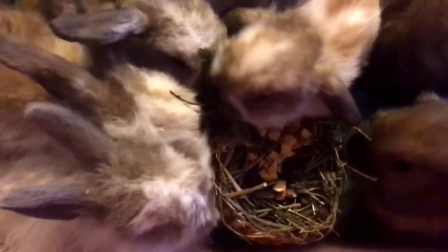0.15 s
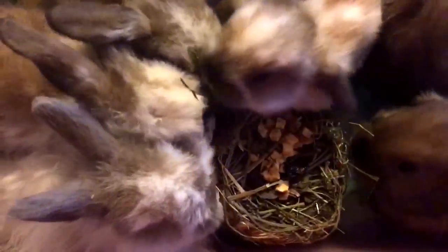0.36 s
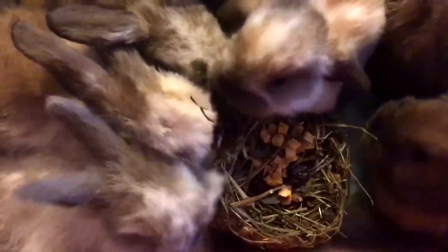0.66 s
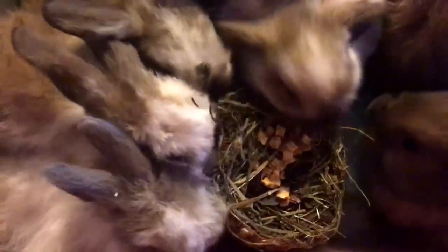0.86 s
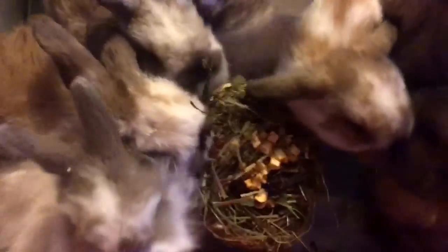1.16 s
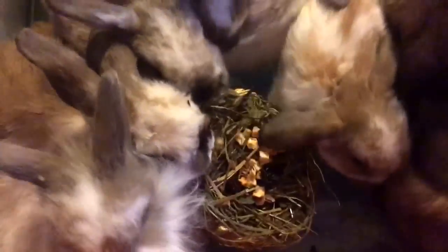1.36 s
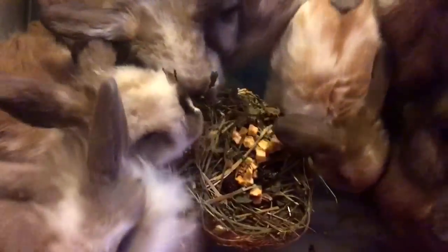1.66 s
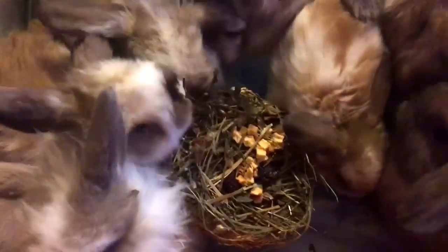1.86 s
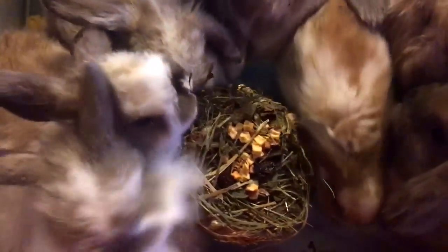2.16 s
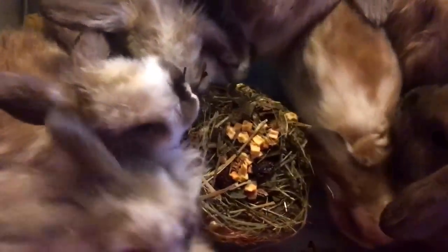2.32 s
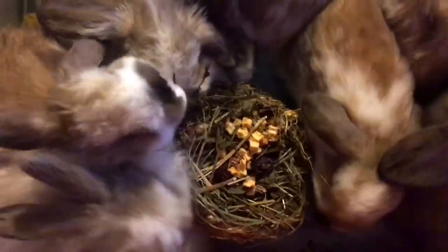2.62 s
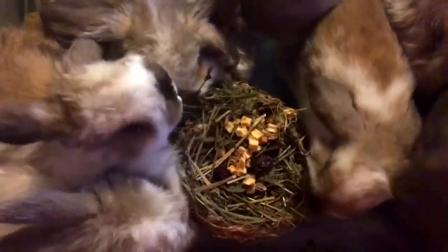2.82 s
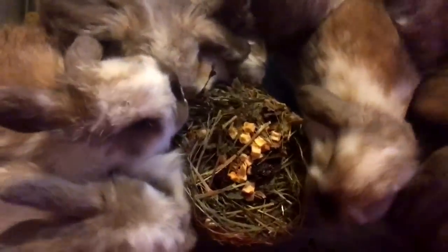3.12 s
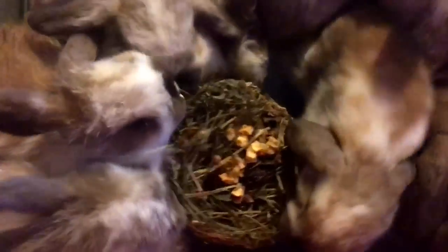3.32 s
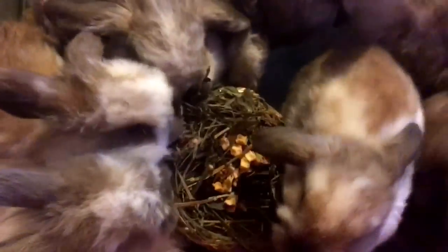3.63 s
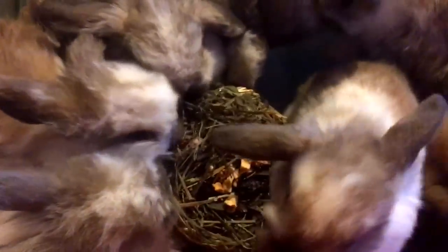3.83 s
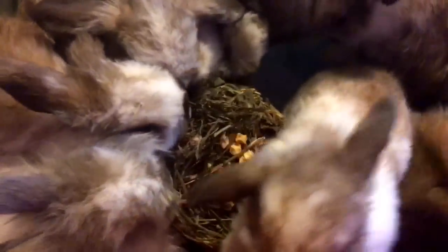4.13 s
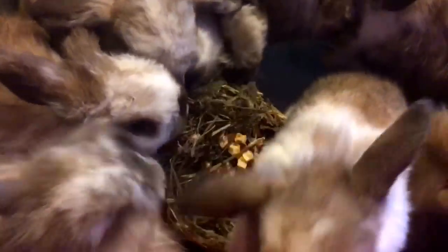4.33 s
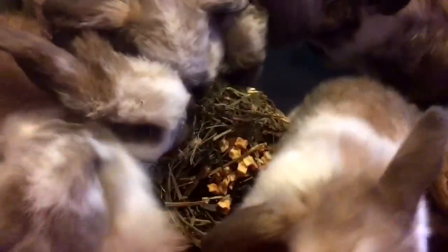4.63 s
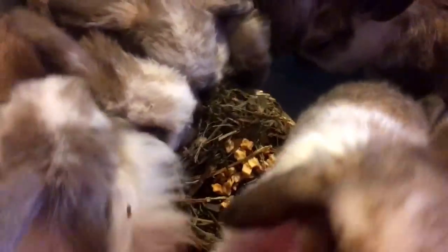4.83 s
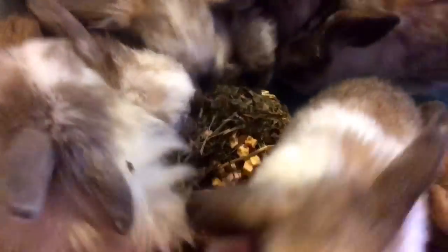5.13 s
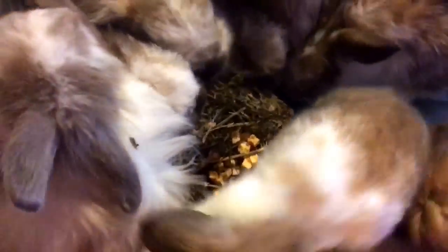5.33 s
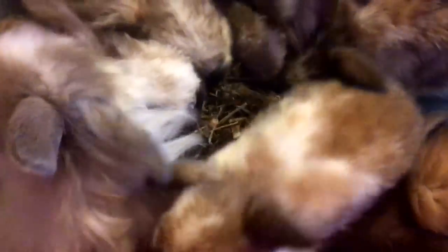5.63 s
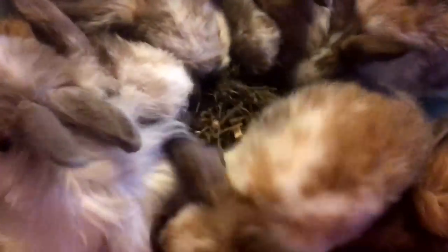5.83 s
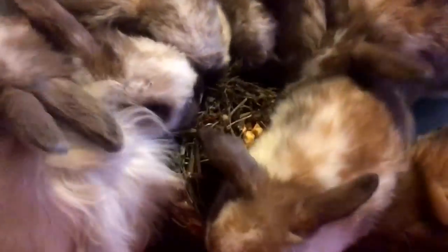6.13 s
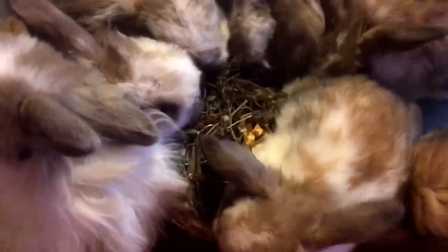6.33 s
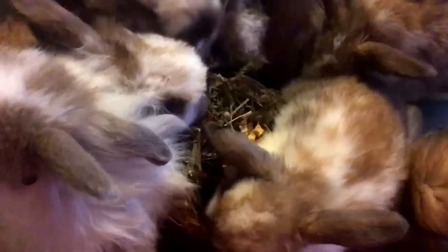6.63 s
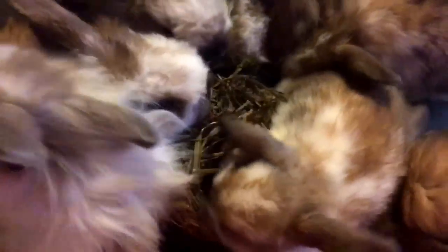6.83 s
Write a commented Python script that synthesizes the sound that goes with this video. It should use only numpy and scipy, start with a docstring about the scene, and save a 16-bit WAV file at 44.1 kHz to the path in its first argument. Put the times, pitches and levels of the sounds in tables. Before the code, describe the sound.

In a quiet room with a steady low hum and rumble, rabbits chew hay at close range: crisp little snaps, grainy rustling and dull tooth clicks, mixed with soft paw steps. Midway comes the brightest crackle as several stalks tear, then a rabbit lands with a dull thud. More crunching leads into a short scuffle of paws on boards, and the munching continues to the end.

```python
"""Rabbits eat from a ball of dry hay, close to the microphone, over a quiet room's appliance hum and rumble.
From the start stalks rustle, snap and faintly squeak, teeth crunch and paws knock on the pen floor.
At 3.3 s a tug breaks a cluster of stalks, and just after it a body lands with the heaviest thud.
From 4.9 to 5.8 s paws scuffle and thump on the boards; the nibbling carries on to the end at 7 s."""
import sys
import numpy as np
from scipy import signal
from scipy.fft import rfft, irfft, next_fast_len
from scipy.io import wavfile
from scipy.ndimage import uniform_filter1d, map_coordinates

SR = 44100
rng = np.random.default_rng(int(sys.argv[2]) if len(sys.argv) > 2 else 0)


def put_to_file(sound):
    """Save the sound as 16-bit audio at rate SR, in the file named by the first command-line argument."""
    columns = np.atleast_2d(sound).T  # one column per channel
    safe = np.clip(columns, -1, 1)
    whole_steps = np.round(safe * 32767)
    wavfile.write(sys.argv[1], SR, whole_steps.astype(np.int16))


N = 307377

# Contacts: (time [s], level [dB], pitch [Hz])
STALK_SNAPS = [(.1675, -47, 3900), (.2583, -51.5, 13400), (.2625, -52, 8500), (.2876, -50.5, 8300),
               (.3967, -54, 8860), (.6734, -46.5, 9400), (.7163, -51, 8000), (.8155, -43.5, 5900),
               (.8328, -48.5, 10600), (.87, -52.5, 8420), (1.068, -37, 8300), (1.0949, -44, 8870),
               (1.2589, -46.5, 5760), (1.3439, -46.5, 8800), (1.38, -45, 6310), (1.3995, -60, 14400),
               (1.4515, -56, 6430), (1.6371, -53, 4430), (1.8159, -49, 8300), (1.94, -55.5, 5480),
               (2.0039, -51.5, 4810), (2.107, -51.5, 3420), (2.1665, -49.5, 4480), (2.2422, -54.5, 8600),
               (2.3142, -42.5, 4520), (2.4481, -51, 4200), (2.7117, -47, 3500), (2.7682, -55.5, 13400),
               (2.8866, -51, 4350), (2.8959, -40.5, 6040), (3.0898, -41.5, 6030), (3.1595, -54.5, 11100),
               (3.2816, -43, 8810), (3.2896, -33.5, 6100), (3.3246, -41, 8600), (3.3352, -25, 8000),
               (3.3407, -32.5, 8560), (3.3551, -42.5, 11600), (3.3657, -37, 11800), (3.3732, -35.5, 6770),
               (3.3811, -41, 9250), (3.3847, -37.5, 5700), (3.39, -37, 8940), (3.3979, -45, 9120),
               (3.455, -46, 9040), (3.5027, -46, 5830), (3.5394, -40.5, 9440), (3.5331, -48.5, 8940),
               (3.5521, -45, 8610), (3.5554, -40, 9990), (3.6223, -43, 8840), (3.6682, -45, 9100),
               (3.6856, -42.5, 5900), (3.7021, -51.5, 5910), (3.712, -52.5, 5930), (3.78, -54, 8700),
               (3.8759, -44.5, 3930), (4.0437, -50, 6270), (4.1088, -35.5, 6150), (4.121, -48, 5890),
               (4.2759, -44, 6050), (4.309, -41, 6500), (4.3171, -47, 8610), (4.4011, -46, 8790),
               (4.4938, -48.5, 9260), (4.6195, -53.5, 13500), (4.6434, -56.5, 6430), (4.7589, -49.5, 6400),
               (4.8364, -52, 8400), (4.9094, -46.5, 9460), (4.9303, -48, 5500), (4.9365, -44.5, 5640),
               (5.0102, -50, 6680), (5.0526, -48, 6680), (5.1106, -51, 9160), (5.1214, -38, 8800),
               (5.1736, -48.5, 5990), (5.2302, -41.5, 11700), (5.2666, -40.5, 5600), (5.271, -47, 9470),
               (5.5664, -47.5, 13100), (5.6163, -45, 13500), (5.4697, -56, 5670), (5.6846, -45.5, 12000),
               (5.7116, -47, 5900), (5.9934, -47.5, 7160), (6.0512, -47, 5420), (6.0876, -48, 9600),
               (6.0999, -42, 9900), (6.1396, -51.5, 8890), (6.209, -55, 4900), (6.2223, -48, 6770),
               (6.556, -49, 8290), (6.6133, -46, 5630), (6.6293, -46, 9400), (6.6598, -50, 5900),
               (6.7689, -45.5, 8510), (6.7971, -55.5, 10000), (6.8024, -47, 10800), (6.8611, -51.5, 4360),
               (6.8877, -44, 11300)]  # stalks breaking
TOOTH_BITES = [(.1674, -48, 750), (.251, -59.5, 764), (.3427, -58.5, 1140), (0.6752, -55.5, 1100),
               (.7171, -47.5, 670), (0.8167, -57.5, 1110), (1.3783, -43.5, 780), (1.5946, -52, 1040),
               (1.7188, -53, 682), (1.8174, -52, 1170), (1.9077, -52, 720), (2.0043, -51, 2230),
               (2.1095, -52, 1960), (2.315, -46, 666), (2.346, -49, 2000), (2.5047, -49.5, 2120),
               (2.6469, -52, 730), (2.7027, -50, 2200), (2.712, -43.5, 640), (2.809, -61, 1930),
               (2.8964, -43.5, 1560), (3.0904, -42, 2210), (3.2901, -56, 1970), (3.3552, -45, 2070),
               (3.3736, -46, 1990), (3.3982, -42.5, 2030), (3.5576, -30.5, 1250), (3.6287, -50.5, 2170),
               (3.7026, -38, 1260), (3.7346, -48.5, 2530), (3.876, -48, 1780), (4.1093, -32, 1180),
               (4.4817, -45.5, 1640), (4.5284, -61, 1030), (4.9311, -45.5, 1120), (4.9367, -41.5, 1840),
               (4.9558, -47.5, 1090), (5.1113, -42.5, 1960), (5.1215, -39.5, 1830), (5.223, -47.5, 2120),
               (5.2297, -41, 1910), (5.271, -50, 2150), (5.3639, -43.5, 950), (5.4064, -43.5, 1940),
               (5.4449, -39.5, 734), (5.4648, -47, 1290), (5.509, -45.5, 708), (5.5754, -50, 2210),
               (5.7424, -45, 809), (5.9164, -56.5, 1900), (5.9215, -49.5, 1000), (5.9548, -53.5, 2130),
               (6.14, -47, 1920), (6.3272, -55.5, 1980), (6.5, -50, 1730), (6.7025, -55, 875),
               (6.7466, -53, 1960), (6.798, -46.5, 1910)]  # teeth meeting
PAW_KNOCKS = [(.021, -42, 268), (0.208, -47.5, 273), (.25, -41, 400), (.251, -45.5, 665), (.372, -33, 284),
              (.385, -39.5, 394), (.516, -53.5, 553), (.719, -53.5, 340), (1.195, -49, 264),
              (1.379, -46, 690), (1.91, -50, 600), (2.166, -40.5, 224), (2.382, -49, 290),
              (2.705, -49, 330), (2.74, -37, 324), (2.845, -50, 275), (2.955, -51.5, 224),
              (3.555, -32.5, 208), (3.71, -53, 345), (3.792, -44, 308), (4.814, -52, 355),
              (4.932, -43, 412), (4.935, -30.5, 362), (5.029, -42, 504), (5.03, -42.5, 258),
              (5.127, -49.5, 314), (5.368, -48.5, 260), (5.403, -44, 294), (5.447, -32, 333),
              (5.507, -36, 400), (5.531, -40, 335), (5.548, -40.5, 267), (5.579, -35.5, 255),
              (5.649, -50, 304), (5.718, -40.5, 340), (5.742, -28.5, 284), (5.756, -31, 322),
              (5.784, -37, 296), (5.897, -47.5, 278), (6.311, -59, 342)]  # paws on the boards

# Noise colours: (frequency [Hz], relative level [dB])
HAY_EQ = [(1500, -87), (2400, -9), (3200, -10), (4050, -2), (6000, 0), (8600, 1.5), (12000, -3.5),
          (15000, -7.5), (16000, -8)]  # bright, dry stalks
CHEW_EQ = [(200, -86), (400, -0.5), (550, 4.5), (850, -4.5), (1150, 0), (1570, -4.5), (1950, 0),
           (2250, -4.5), (3000, -9), (3900, -19.5), (6600, -120)]  # midrange grinding
SHUFFLE_EQ = [(80, -104), (150, -3), (220, -5.5), (310, -1.5), (420, -7.5), (600, -42.5), (900, -25.5),
              (1500, -120)]  # soft, dull paws
RUMBLE_EQ = [(15, -26), (25, -29), (35, -7), (60, 2.5), (90, -2), (140, 1.5), (190, -21), (260, -22),
             (400, -25), (800, -120)]  # the room's low end


def amp(db):
    """Gain of a level in dB."""
    return 10 ** (np.asarray(db) / 20)


def unit(x):
    """x at rms 1."""
    return x / np.sqrt(np.mean(x ** 2) + 1e-20)


def wobble(rate):
    """A smooth random curve with `rate` knots a second."""
    knots = rng.standard_normal(int(N * rate / SR) + 4)
    return map_coordinates(knots, [np.arange(N) * rate / SR])


def filtered(x, response):
    """x through a gain curve, given as a function of frequency in Hz."""
    size = next_fast_len(N + 8192)
    return irfft(rfft(x, size) * response(np.fft.rfftfreq(size, 1 / SR)), size)[..., :N]


def coloured(x, eq):
    """x through an EQ curve drawn on a log frequency axis, at rms 1."""
    eq_hz, eq_db = np.transpose(eq)
    return unit(filtered(x, lambda hz: amp(np.interp(np.log(hz + 1), np.log(eq_hz), eq_db))))


def patchy(x, depth_db):
    """x with its colour shifting in random patches of time and frequency, at rms 1."""
    spectrum = signal.stft(x, nperseg=256)[2]
    patches = uniform_filter1d(rng.standard_normal(spectrum.shape), size=4, axis=0)
    patches = unit(uniform_filter1d(patches, size=10, axis=1))
    return unit(signal.istft(spectrum * amp(depth_db * patches), nperseg=256)[1][:N])


def crackle(per_second, spread_db, life_s, clump_db, clump_rate, rub):
    """Noise gated by short random slips of unequal size over a smooth rub, swelling in clumps."""
    slips = (rng.random(N) < per_second / SR) * amp(spread_db * rng.standard_normal(N))
    grain = np.exp(-(np.arange(-512, 513) / (life_s * SR)) ** 2)
    gate = rub + unit(signal.fftconvolve(slips, grain, "same"))
    return gate * amp(clump_db * wobble(clump_rate)) * rng.standard_normal(N)


def bursts(events, rough, eq, reach, modes=()):
    """Bell-shaped pulses of tone, body modes and noise, cut `reach` samples either side of each event."""
    track = np.zeros(N + 2 * reach)
    t = np.arange(-reach, reach) / SR
    noise = np.pad(coloured(rng.standard_normal(N), eq), reach)
    body = sum(amp(db) * np.cos(2 * np.pi * hz * t) for hz, db in modes)
    for time, db, hz, width_ms in events:
        start = round(time * SR)
        span = slice(start, start + 2 * reach)
        bell = np.exp(-np.log(2) * (2000 * t / width_ms) ** 2)  # width at half height
        pulse = bell * (rough * noise[span] + body - np.sin(2 * np.pi * hz * t))
        # as much energy as a tone under this bell peaking at db
        track[span] += amp(db) * pulse * np.linalg.norm(bell) / np.linalg.norm(pulse) / np.sqrt(2)
    return track[reach:N + reach]


def swells(times, db, rise_ms, fall_ms, edge=2.5):
    """Power envelope of swells peaking at `times`; edge 2 is a bell, higher is squarer."""
    hop = 64
    t = np.arange(0, N + hop, hop) / SR - np.asarray(times)[:, None]
    slope_ms = np.where(t < 0, np.reshape(rise_ms, (-1, 1)), np.reshape(fall_ms, (-1, 1)))
    shapes = np.exp(-np.abs(1000 * t / slope_ms) ** edge)
    power = (amp(db)[:, None] ** 2 * shapes).sum(0)
    return np.interp(np.arange(N) / hop, np.arange(len(power)), power)


def room_tone():
    """An appliance's mains hum, low rumble and smooth hiss, each wavering a little in level."""
    # Hum partials: (frequency [Hz], rms level [dB])
    partials = [(120.4, -49), (181.5, -68.5), (241, -80.5)]
    # Hiss colour: (frequency [Hz], relative level [dB])
    hiss_eq = [(100, -92), (200, -47), (320, 10), (420, 9.5), (550, -8), (900, 0), (2000, -11),
               (2900, -16.5), (5000, -12), (9000, -16.5), (16000, -17)]
    t = np.arange(N) / SR
    hum = sum(np.sqrt(2) * amp(db + .28 * wobble(1.3)) * np.sin(2 * np.pi * hz * t)
              for hz, db in partials)
    rumble = amp(-55.5 + .59 * wobble(5.1)) * coloured(rng.standard_normal(N), RUMBLE_EQ)
    hiss = amp(-73.5 + .9 * wobble(4)) * coloured(rng.standard_normal(N), hiss_eq)
    return hum + rumble + hiss


def contact_stir(contacts, db, fall_ms):
    """Power of the stir round each contact: `db` for a -45 dB contact, more for louder ones."""
    times, contact_db, _ = np.transpose(contacts)
    return swells(times, db + .45 * (contact_db + 45), fall_ms / 2, fall_ms, edge=2)


def stir_gains():
    """Gain envelopes of hay, jaws and paws: a steady stir that swells at each tug and contact."""
    # The steady stir: (time [s], hay [dB], jaws [dB], paws [dB])
    steady = [(0.0, -70.5, -72, -66.5), (0.62, -74, -73.5, -68.5), (1.16, -70.5, -69, -65),
              (1.57, -69, -71.5, -69.5), (2.08, -75, -71, -67.5), (2.31, -68.5, -68, -65.5),
              (2.56, -71, -71.5, -70), (2.87, -65, -72.5, -67), (3.18, -69.5, -72.5, -70),
              (3.51, -67.5, -70, -65), (3.67, -65.5, -70, -65.5), (4.02, -67, -66, -61.5),
              (4.6, -72, -73.5, -71), (4.97, -69.5, -70, -65), (5.32, -65.5, -66.5, -64),
              (5.65, -64, -64.5, -57.5), (6.23, -68.5, -71.5, -69.5), (6.97, -68.5, -68, -68)]
    # A mouthful is pulled and ground: (time [s], hay [dB], jaws [dB], pull [ms], release [ms])
    tugs = [(.2, -66.5, -73.5, 55, 38), (.345, -65.5, -74, 20, 18), (0.45, -63, -75.5, 14, 20),
            (.65, -71, -73.5, 80, 60), (.865, -73, -75, 44, 42), (0.942, -70.5, -79, 26, 17),
            (1.03, -61.5, -68, 38, 21), (1.085, -55.5, -62.5, 30, 33), (1.151, -64, -67, 34, 50),
            (1.301, -67, -71, 80, 70), (1.7, -72, -73, 94, 80), (2.13, -72, -66.5, 30, 55),
            (2.341, -65.5, -66.5, 120, 150), (2.8, -69, -74, 34, 38), (2.89, -64.5, -62, 16, 41),
            (3.1, -66, -65.5, 14, 45), (3.289, -59, -70, 40, 30), (3.364, -51.5, -62, 45, 32),
            (3.455, -58.5, -67.5, 26, 45), (3.555, -60.5, -69, 25, 45), (3.685, -59.5, -65, 40, 33),
            (3.75, -70, -65, 33, 55), (3.885, -63.5, -63, 20, 25), (3.969, -64.5, -60.5, 31, 38),
            (4.138, -59.5, -61, 40, 25), (4.307, -59.5, -69, 64, 23), (4.4, -61, -68.5, 15, 30),
            (4.49, -64, -75.5, 22, 40), (4.7, -69.5, -67, 60, 84), (5.226, -52.5, -60.5, 49, 35),
            (5.436, -62.5, -66, 46, 40), (5.599, -61, -62, 60, 13), (5.67, -70.5, -61, 27, 30),
            (5.775, -59.5, -58.5, 60, 38), (5.93, -60.5, -61.5, 70, 30), (6.09, -61, -66, 70, 11),
            (6.31, -71.5, -66.5, 27, 40), (6.621, -59, -69.5, 70, 46), (6.8, -69, -71, 40, 30),
            (6.96, -62.5, -71.5, 40, 33)]
    times, *steady_db = np.transpose(steady)
    hay, jaws, paws = (amp(np.interp(np.arange(N) / SR, times, db)) ** 2 for db in steady_db)
    tug_times, hay_db, jaws_db, pull_ms, release_ms = np.transpose(tugs)
    brace_db = -64 + .5 * (jaws_db + 60)  # paws brace harder under a stronger tug
    hay += swells(tug_times, hay_db, pull_ms, release_ms) + contact_stir(STALK_SNAPS, -67, fall_ms=10)
    jaws += swells(tug_times, jaws_db, pull_ms, release_ms) + contact_stir(TOOTH_BITES, -68.5, fall_ms=10)
    paws += swells(tug_times, brace_db, pull_ms, release_ms)
    paws += contact_stir(PAW_KNOCKS, -63.5, fall_ms=29)
    return np.sqrt([hay, jaws, paws])


def feeding_bed():
    """Slipping stalks, grinding jaws and shuffling paws keep up a grainy bed under the single hits."""
    stalks = crackle(1200, spread_db=3.5, life_s=.00035, clump_db=.9, clump_rate=45, rub=1.3)
    grind = crackle(300, spread_db=3, life_s=.0015, clump_db=1.2, clump_rate=20, rub=.9)
    scuffs = crackle(90, spread_db=2.5, life_s=.004, clump_db=1.2, clump_rate=14, rub=.7)
    mouthful = .53 * unit(stalks) + unit(grind)  # the same stalks sound in the chewing band too
    hay_gain, jaws_gain, paws_gain = stir_gains()
    rustle = hay_gain * patchy(coloured(stalks, HAY_EQ), depth_db=1.6)
    chewing = jaws_gain * patchy(coloured(mouthful, CHEW_EQ), depth_db=2)
    shuffle = paws_gain * coloured(scuffs, SHUFFLE_EQ)
    return rustle + chewing + shuffle


def stalk_squeaks():
    """A sliding stalk sticks and slips: a short tone with a fluttering level."""
    # Sliding stalks: (time [s], level before flutter [dB], pitch [Hz], width [ms])
    slides = [(.232, -66, 2990, 13), (1.14, -71, 1394, 86), (3.75, -61, 1850, 8.3), (3.95, -64, 1190, 20),
              (3.965, -67.5, 3580, 37), (3.975, -60, 1860, 17), (4.04, -67, 1210, 34),
              (4.165, -71, 1390, 72), (4.335, -67.5, 1770, 35), (4.69, -68, 2000, 13),
              (5.66, -66, 1960, 24), (5.76, -65, 1160, 40)]
    flutter = amp(2.8 * wobble(330))
    return flutter * bursts(slides, rough=.093, eq=CHEW_EQ, reach=4096)


def floor_hits():
    """A paw gives the boards a short knock; a whole body landing gives a low thud."""
    # Bodies landing, the heaviest ringing on in a lower second swing: (time [s], level [dB], pitch [Hz], width
    # [ms])
    landings = [(0.378, -30.5, 92, 8.9), (0.392, -45, 95.0, 14.0), (2.169, -45, 61, 34),
                (2.961, -34.5, 89, 14), (2.985, -37.5, 55, 25), (3.558, -19, 102, 10.3),
                (3.574, -27, 62.4, 20), (3.615, -36, 77, 13), (4.675, -47, 89, 35), (4.932, -26, 69.6, 6.4),
                (5.03, -42, 71.3, 8.8), (5.066, -41, 61.9, 21), (5.457, -35.5, 87, 18),
                (5.509, -40, 59.2, 21), (5.54, -38.5, 68, 20), (5.735, -29.5, 107, 10),
                (5.815, -40, 75, 44), (6.061, -39.5, 56.5, 43)]
    knock_cycles = 2.05
    steps = [(time, db, hz, 1000 * knock_cycles / hz) for time, db, hz in PAW_KNOCKS]
    knocks = bursts(steps, rough=.34, eq=SHUFFLE_EQ, reach=2048)
    thuds = bursts(landings, rough=0, eq=RUMBLE_EQ, reach=4096)
    return knocks + thuds


def tooth_clicks():
    """Teeth meet and click dully through the jaw: a few cycles, no top end."""
    # Jaw resonances rung by every bite: (frequency [Hz], relative level [dB])
    jaw_modes = [(620, -7.5), (1180, -17), (1550, -23), (1900, -8.5), (2250, -14)]
    bite_ms = 1.76
    bites = [(*bite, bite_ms) for bite in TOOTH_BITES]
    return bursts(bites, rough=.46, eq=CHEW_EQ, reach=512, modes=jaw_modes)


def faint_ticks(count, over_db, spread_db, width_ms):
    """Burst events for tiny random snaps, denser and stronger where the hay is loud."""
    hay_gain = stir_gains()[0]
    time_draw, level_draw, pitch_draw = rng.random((count, 3)).T
    activity = np.cumsum(np.sqrt(hay_gain))
    at = np.searchsorted(activity, time_draw * activity[-1])
    db = 20 * np.log10(hay_gain[at]) + over_db + spread_db * (level_draw - .5)
    hz = np.array(STALK_SNAPS)[(pitch_draw * len(STALK_SNAPS)).astype(int), 2]
    return [(*tick, width_ms) for tick in zip(at / SR, db, hz)]


def stalk_snaps():
    """A dry stalk breaks in about a millisecond, broad and bright."""
    snap_ms = 1.16
    snaps = [(*snap, snap_ms) for snap in STALK_SNAPS]
    ticks = faint_ticks(count=160, over_db=9, spread_db=10, width_ms=.6)
    return bursts(snaps + ticks, rough=1.2, eq=HAY_EQ, reach=256)


def scene():
    """The rabbits in their pen over the room tone, in mono."""
    rabbits = feeding_bed() + stalk_snaps() + tooth_clicks() + stalk_squeaks() + floor_hits()
    return (rabbits + room_tone())[None]


def record(dry):
    """The microphone housing dips a few treble bands; the deepest bass and the very top are cut."""
    # Housing dips: (centre [Hz], width [Hz], depth [dB])
    dips = [(2880, 310, 6), (4970, 380, 4.5), (7590, 1240, 6), (10400, 690, 6)]
    low_cut_hz, top_hz = 36, 15870

    def response(hz):
        dip_db = sum(depth * np.exp(-((hz - centre) / width) ** 2) for centre, width, depth in dips)
        low_cut = hz ** 4 / (hz ** 4 + low_cut_hz ** 4)
        return amp(-dip_db) * low_cut * (hz < top_hz)

    return filtered(dry, response)


dry = scene()
out = record(dry)
put_to_file(out)
```